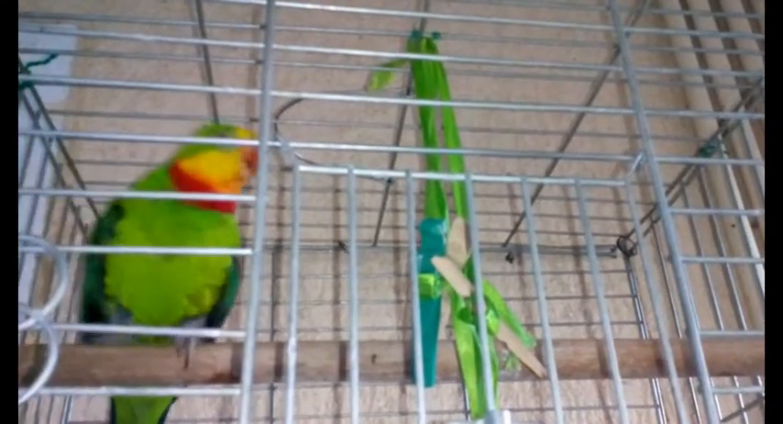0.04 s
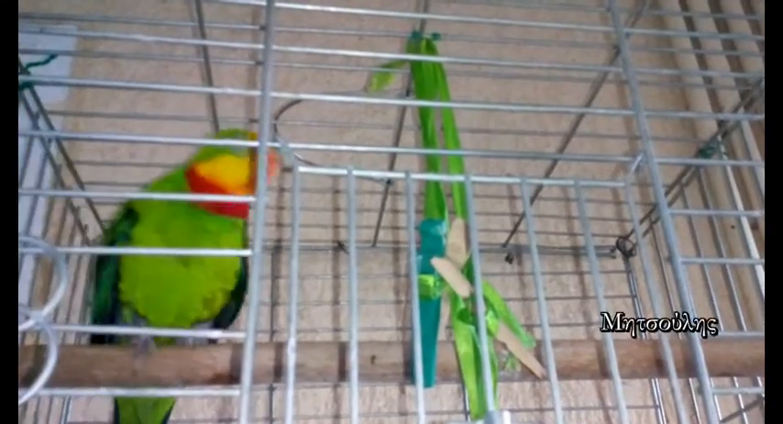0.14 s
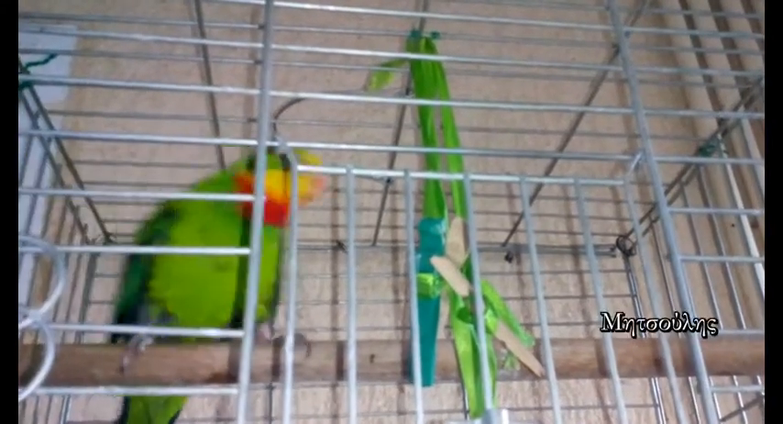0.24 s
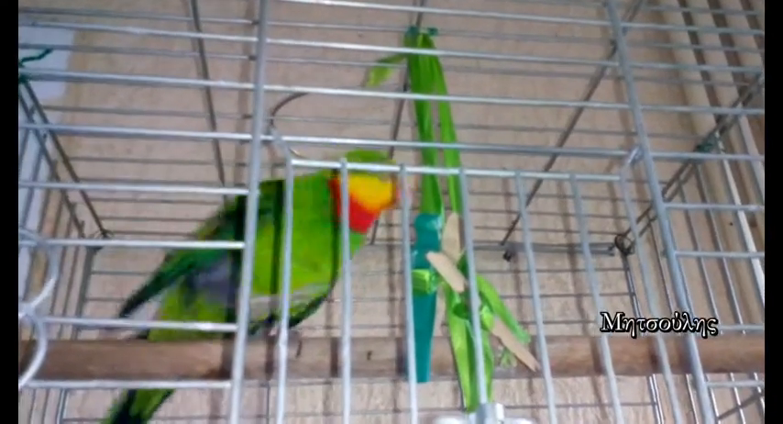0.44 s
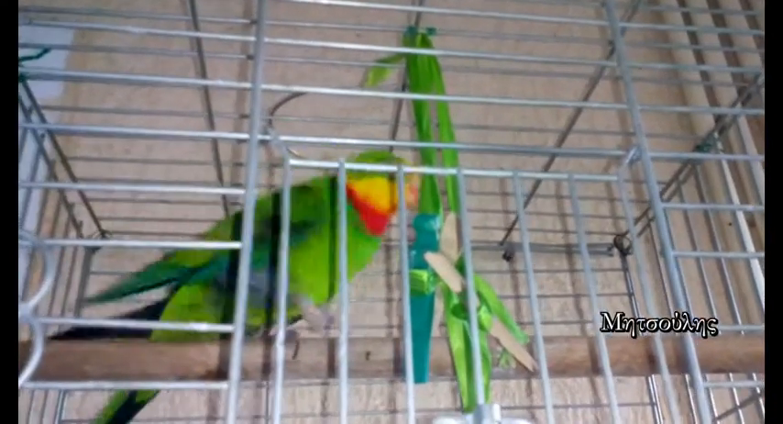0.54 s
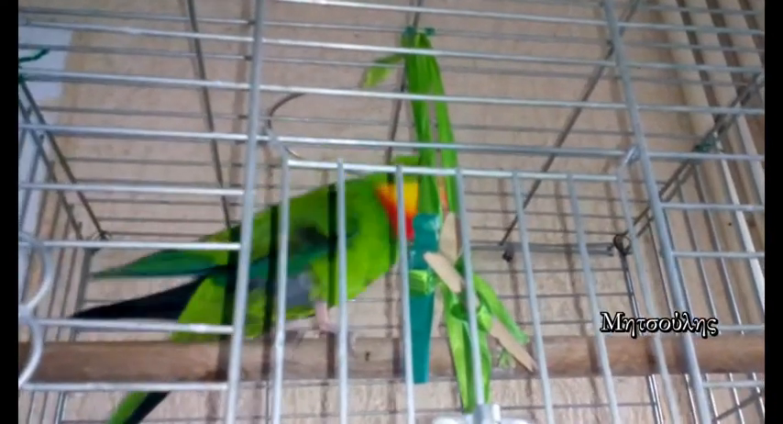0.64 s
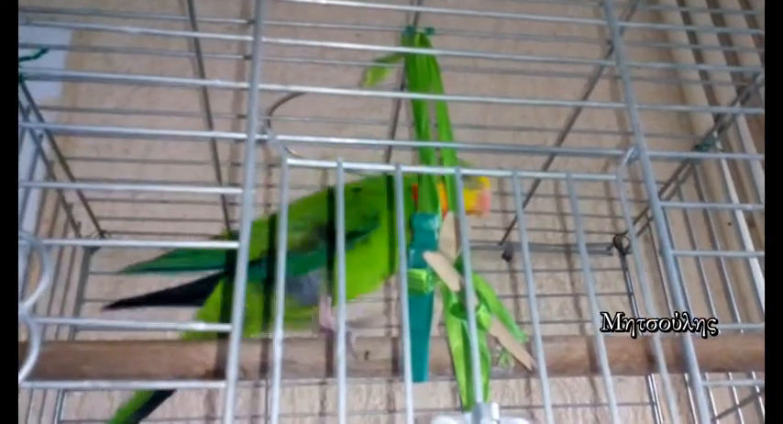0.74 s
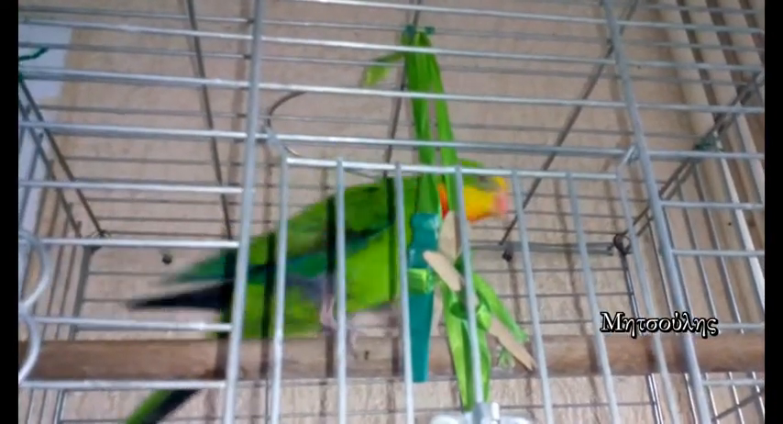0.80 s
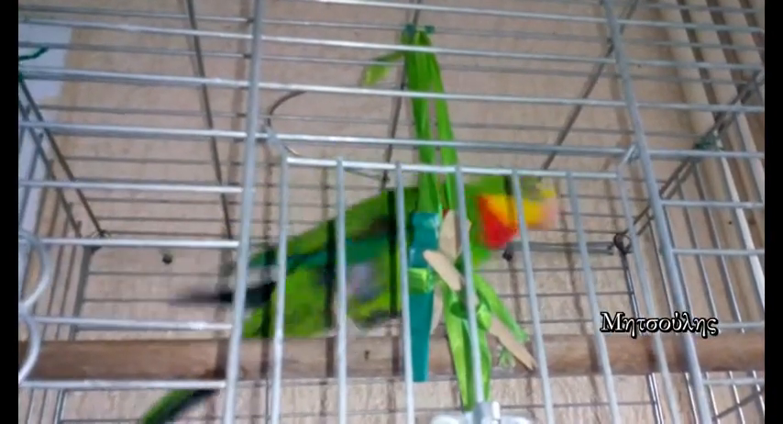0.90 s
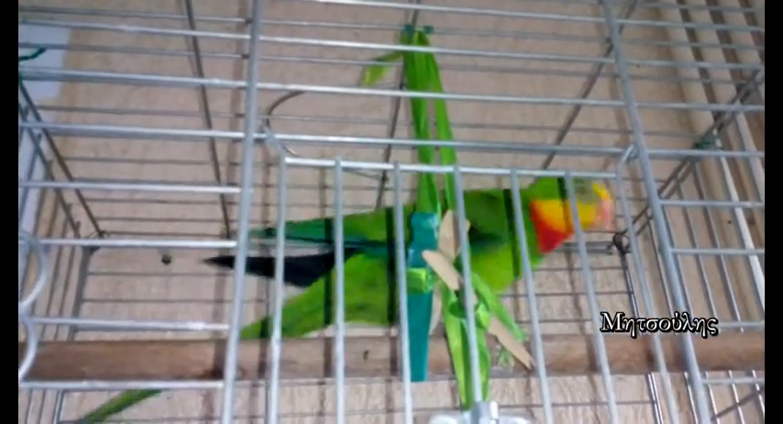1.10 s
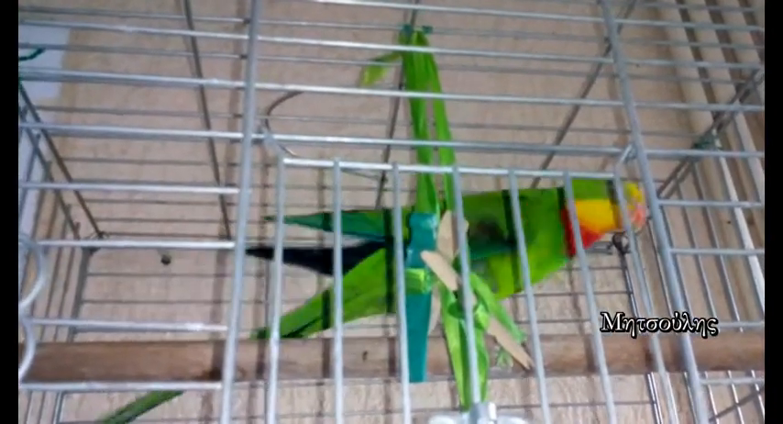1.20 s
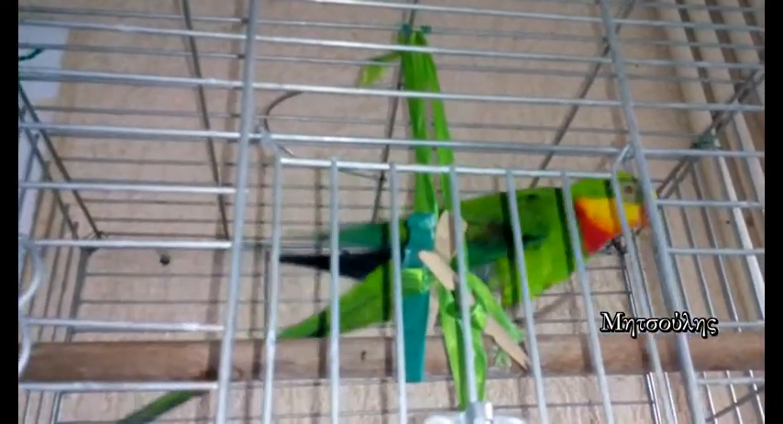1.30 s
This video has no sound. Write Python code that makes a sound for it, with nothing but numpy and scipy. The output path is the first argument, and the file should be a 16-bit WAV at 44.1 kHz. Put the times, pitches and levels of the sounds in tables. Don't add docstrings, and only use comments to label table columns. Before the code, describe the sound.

A parrot close to a small microphone lets out one harsh, rapidly warbling squawk and a tiny piped note, slightly overloaded; a second bird chirps faintly far off before and after, in a reverberant room.

```python
import sys
import numpy as np
from scipy import signal
from scipy.fft import rfft, irfft
from scipy.io import wavfile
from scipy.ndimage import uniform_filter1d

SR = 44100
rng = np.random.default_rng(int(sys.argv[2]) if len(sys.argv) > 2 else 0)


def volts(x):
    e = np.asarray(x, float) / 20
    return 10 ** e


def transcribe(signal):
    frames = np.atleast_2d(signal).T
    limited = np.clip(frames, -1, 1)
    pcm = np.round(limited * 32767).astype(np.int16)
    wavfile.write(sys.argv[1], SR, pcm)


N = 59535

# f/Hz, level/dB per Hz
AIR_SPECTRUM = [(20, -11.5), (100, -18), (250, -23), (800, -25.5), (1700, -25.5), (2500, -32),
                (3400, -30.5), (12000, -54.5)]
# t/s, level change/dB
AIR_SWELL = [
    (0, -0.5),
    (.2, 1.5),
    (.9, -3.5),
    (1.1, -2),
    (1.17, 6),
    (1.35, 3),
]
# f/Hz, width/Hz, level/dB
ROOM_MODES = [(112.7, 7.1, 2), (135, 11.2, 1.5), (180.5, 11, -6), (230, 7.4, -17.5), (326, 16, -12),
              (509, 6.6, -21.5), (602, 270, -11.5)]
# t/s, level/dB
RUMBLE = [(0.0, -30.5), (0.074, -33), (0.398, -49.5), (0.586, -50.5), (0.66, -38), (0.74, -48.5),
          (0.842, -41), (0.894, -48), (0.98, -37.5), (1.078, -40.5), (1.194, -33.5), (1.24, -43),
          (1.282, -37), (1.35, -37)]
AIR_DB, SWELL_TOP_HZ = -48.5, 1490

# t/s, f/Hz, level/dB
CHIRPS = [
    [(.004, 4470, -28), (.013, 4950, -35.5), (.021, 5140, -22.5), (.04, 5380, -42), (.05, 5200, -63)],
    [(.02, 4217, -26), (.032, 3840, -34.5), (.043, 3394, -25), (.055, 2635, -50.5), (.07, 3330, -39),
     (.086, 4110, -37), (.096, 4200, -77)],
    [(.07, 2685, -40.5), (.085, 3000, -37.5), (.1, 2917, -53), (.11, 3060, -47)],
    [(.77, 5080, -63), (.775, 5158, -28.5), (.785, 5162, -37), (.791, 4880, -22.5), (.815, 4580, -34),
     (.84, 4715, -37), (.85, 4550, -71.5)],
    [(.772, 3150, -60), (.78, 3123, -55), (.8, 3124, -41), (.82, 3400, -56)],
    [(.795, 4280, -24.5), (.81, 3500, -31), (.825, 3097, -38), (.855, 2920, -35), (.872, 4000, -31),
     (.886, 4060, -39), (.896, 4900, -35)],
]
CHIRP_OCTAVE_DB = [-38.5, -9, 0.5, -27, 7, -3]
CHIRP_SHAKE = [0.012, .03, 0.0033, 0.031, 0.028, 0.0296]
CHIRP_RASP, FAR_TOP_HZ = 0.33, 6390
FAR_DRY_DB, FAR_DECAY_FACTOR = -8, 0.63

# f/Hz, t60/s
ROOM_DECAY = [(500, 0.26), (1500, 0.47), (3000, 0.7), (5000, 0.68), (8000, 0.32)]
# t/s, level/dB
ECHOES = [(.004, -12), (.009, -17), (.0145, -13.5), (.022, -16.5), (.031, -24.5)]
ROOM_DB = -9

# trough t/s, trough f/Hz, crest t/s, crest f/Hz
BEATS = [(.227, 680, .233, 900), (.2345, 750, .240, 1250), (.244, 780, .249, 1280), (.252, 850, .258, 1320),
         (.262, 930, .272, 1400), (.275, 900, .283, 1480), (.287, 930, .297, 1550), (.305, 970, .313, 1530),
         (.323, 1000, .332, 1540), (.341, 950, .370, 1680), (.382, 1250, .391, 1430),
         (.406, 1190, .430, 1560), (.438, 1300, .447, 1720), (.456, 1180, .466, 1740)]
BEAT_DB = [-8.5, -19, -7, -10.5, -6.5, -9.5, -9, -7, -5.5, -9, -6.5, -8.5, -10, -13.5]
# t/s, half length/s, level change/dB
CATCHES = [(0.2668, 0.00085, -12), (0.323, 0.0034, -17), (0.3711, 0.0024, -18.5), (0.3826, 0.0014, -3.5),
           (0.4242, .002, -12), (0.434, 0.0027, -22), (0.455, 0.00067, -3), (0.253, 0.0017, 0.5),
           (.268, 0.0027, 3), (0.325, .002, 1), (0.337, 0.0009, 2.5), (0.376, 0.0025, 4.5),
           (0.393, 0.0022, 2), (.425, 0.00079, 11.5), (.438, 0.0011, -0.5), (0.45, 0.0024, 3.5)]
SQUAWK_TONES_DB = [-2, 2.5, -6.5, -8, -8, -4.5]
# f/Hz, width/Hz, level/dB
THROAT = [(1008, 250, -9.5), (1451, 261, -0.5), (1970, 728, -1), (2596, 369, 1), (3521, 1100, -1),
          (4886, 550, -1), (6670, 2400, -16.5)]
SQUAWK_END_S, END_HZ, END_DB = 0.49, 1620, -34
DIP_EARLY_DB, DIP_LATE_DB, DIP_FADE_S = -13, -2, 0.032
WARM_DB, WARM_S = -11, 0.027
LEAD_S, RING_LAG_S = 0.0019, 0.0016
FLUTTER_DB, JITTER = 2, 0.017
RASP, LATE_RASP, RASP_FROM_S = 0.11, 2.2, 0.43
DULL_FROM = 0.26
GAP_HZ, GAP_WIDTH_HZ, GAP_SHARE = 4150, 600, 0.75

# t/s, f/Hz, level/dB, tilt per harmonic/dB
PIPE = [
    (0.493, 1400, -51.5, -30.5),
    (.497, 1431, -10.5, -26.5),
    (0.501, 1479, -5.5, -24),
    (0.506, 1495, -6.5, 1),
    (0.514, 1536, -22, 7.5),
    (.521, 1592, -6.5, -9.5),
    (0.526, 1560, -61.5, -24.5),
]
PIPE_TONES_DB = [-0.5, 7, -18, -19, -17, -43]

MIC_LOW_HZ, MIC_TOP_HZ, CEILING, DRIVE_DB, HISS_LEVEL_DB = 45, 7220, 1, 0.5, -78


def evened(x):
    return x / np.sqrt(np.mean(x ** 2) + 1e-20)


def slow_noise(width):
    return evened(uniform_filter1d(rng.standard_normal(N), width))


def read(points, hz):
    f, value = np.transpose(points)
    return np.interp(np.log(hz + 1), np.log(f + 1), value)


def resonate_twice(x, hz, width):
    pole_pair = signal.iirpeak(hz, hz / width, SR)
    return signal.lfilter(*pole_pair, signal.lfilter(*pole_pair, x))


def background():
    hz, t = np.fft.rfftfreq(N, 1 / SR), np.arange(N) / SR
    air = evened(irfft(rfft(rng.standard_normal(N)) * volts(read(AIR_SPECTRUM, hz)), N))
    low = signal.sosfilt(signal.butter(2, SWELL_TOP_HZ, fs=SR, output="sos"), air)
    air = air + (volts(np.interp(t, *np.transpose(AIR_SWELL))) - 1) * low
    boom = np.zeros(N)
    for f, width, db in ROOM_MODES:
        boom += volts(db) * evened(resonate_twice(rng.standard_normal(N), f, width * 1.3))
    return volts(AIR_DB) * air + volts(np.interp(t, *np.transpose(RUMBLE))) * evened(boom)


def chirps():
    t, out = np.arange(N) / SR, np.zeros(N)
    for points, octave_db, shake in zip(CHIRPS, CHIRP_OCTAVE_DB, CHIRP_SHAKE):
        s, hz, db = np.transpose(points)
        wobble = 1 + shake * slow_noise(120)
        phase = 2 * np.pi * np.cumsum(np.interp(t, s, hz) * wobble) / SR
        fizz = 1 + CHIRP_RASP * np.sqrt(shake / 0.022) * slow_noise(14)
        whistle = np.sin(phase) + volts(octave_db) * np.sin(2 * phase)
        out += fizz * volts(np.interp(t, s, db, -200, -200)) * whistle
    return signal.sosfilt(signal.butter(6, FAR_TOP_HZ, fs=SR, output="sos"), out)


def room(x, decay_factor, rise_s):
    taps = np.zeros(SR)
    at = np.arange(40, SR - 20, 20)
    taps[at + rng.integers(0, 20, len(at))] = rng.choice([-1., 1.], len(at))
    hz, t, z = signal.stft(taps, SR, nperseg=256)
    t60 = decay_factor * read(ROOM_DECAY, hz)[:, None]
    tail = signal.istft(z * volts(-60 * t / t60), SR, nperseg=256)[1]
    tail = tail * (1 - np.exp(-np.arange(len(tail)) / SR / rise_s))
    return signal.fftconvolve(x, tail / np.linalg.norm(tail))[:N]


def glide(t, times, values):
    place = np.interp(t, times, np.arange(len(times)))
    whole = np.minimum(place.astype(int), len(times) - 2)
    ease = 0.5 - 0.5 * np.cos(np.pi * (place - whole))
    return values[whole] + ease * (values[whole + 1] - values[whole])


def voice(hz, level_db, tones_db, tilt_db, rasp):
    shake = slow_noise(60)
    phase = 2 * np.pi * np.cumsum(hz * (1 + JITTER * rasp / RASP * shake)) / SR
    folds = np.zeros(N)
    for k, db in enumerate(tones_db):
        folds += volts(db + tilt_db * abs(k - DULL_FROM)) * np.cos((k + 1) * phase)
    breath = rasp * (1 + np.cos(phase)) * rng.standard_normal(N)
    source = (folds + breath) * volts(level_db)
    out = np.zeros(N)
    for k, (f, width, db) in enumerate(THROAT):
        out += (-1) ** k * volts(db) * resonate_twice(source, f, width * 1.31)
    return out


def squawk():
    heard = np.arange(N) / SR
    t = heard + RING_LAG_S
    low_s, low_hz, top_s, top_hz = np.transpose(BEATS)
    times = np.append(np.ravel([low_s, top_s], "F"), SQUAWK_END_S)
    hz = glide(t, times, np.append(np.ravel([low_hz, top_hz], "F"), END_HZ))
    dip = DIP_LATE_DB + (DIP_EARLY_DB - DIP_LATE_DB) * np.exp(-(low_s - low_s[0]) / DIP_FADE_S)
    effort = np.append(np.ravel([BEAT_DB + dip, BEAT_DB], "F"), END_DB)
    level = glide(t + LEAD_S, times, effort)
    for s, half, db in CATCHES:
        level = level + db * np.exp(-((heard - s) / half) ** 2)
    level = level + FLUTTER_DB * evened(uniform_filter1d(slow_noise(90), 90))
    sounding = (t + LEAD_S > times[0]) & (t < times[-1])
    dull = WARM_DB * np.exp(-np.maximum(t - times[0], 0) / WARM_S)
    rasp = RASP * np.where(t > RASP_FROM_S, LATE_RASP, 1)
    call = voice(hz, np.where(sounding, level, -200), SQUAWK_TONES_DB, dull, rasp)
    gap = signal.lfilter(*signal.iirpeak(GAP_HZ, GAP_HZ / GAP_WIDTH_HZ, SR), call)
    return call - GAP_SHARE * gap


def echoes(x):
    out = np.zeros(N)
    for k, (s, db) in enumerate(ECHOES):
        out += (-1) ** k * volts(db) * np.roll(x, round(s * SR))
    return out


def pipe():
    t = np.arange(N) / SR
    s, hz, db, tilt = np.transpose(PIPE)
    level = np.interp(t, s, db, -200, -200)
    return voice(np.interp(t, s, hz), level, PIPE_TONES_DB, np.interp(t, s, tilt), 0.056)


def scene():
    near, far = squawk() + pipe(), chirps()
    parrot = near + echoes(near) + volts(ROOM_DB) * room(near, 0.98, 0.0033)
    far_bird = volts(FAR_DRY_DB) * far + room(far, FAR_DECAY_FACTOR, 0.015)
    return (parrot + far_bird + background())[None]


def top_cut(x):
    return signal.sosfilt(signal.butter(12, 15700, fs=SR, output="sos"), x)


def record(dry):
    band = signal.butter(4, [MIC_LOW_HZ, MIC_TOP_HZ], "band", fs=SR, output="sos")
    clipped = np.clip(volts(DRIVE_DB) * signal.sosfilt(band, dry), -CEILING, CEILING)
    mix = clipped + volts(HISS_LEVEL_DB) * rng.standard_normal(dry.shape)
    return top_cut(mix)


dry = scene()
out = record(dry)
transcribe(out)
```